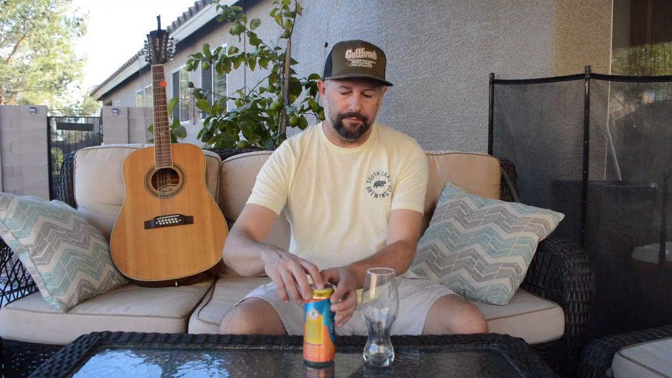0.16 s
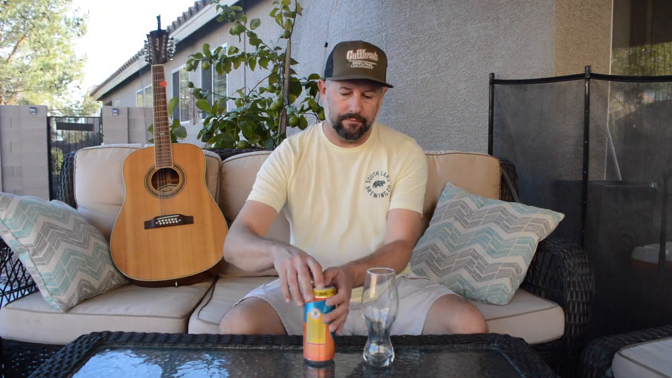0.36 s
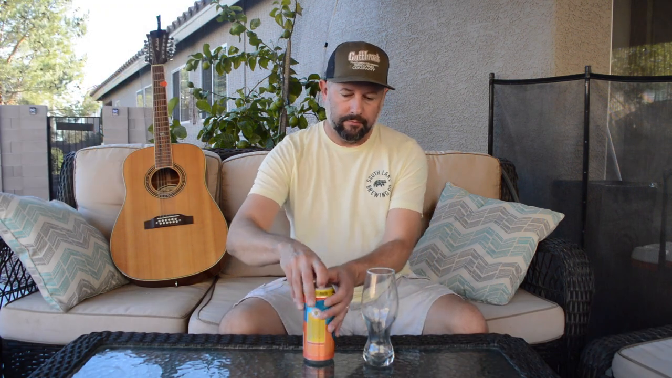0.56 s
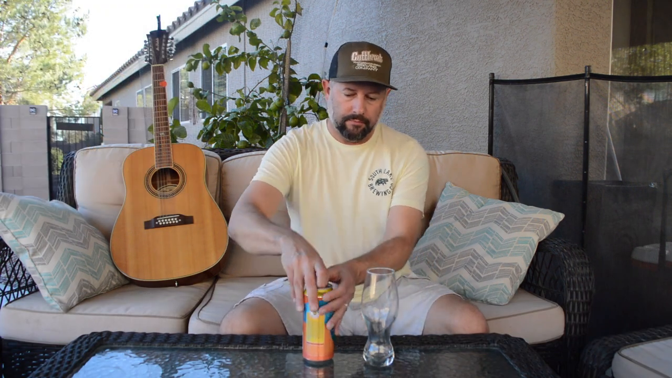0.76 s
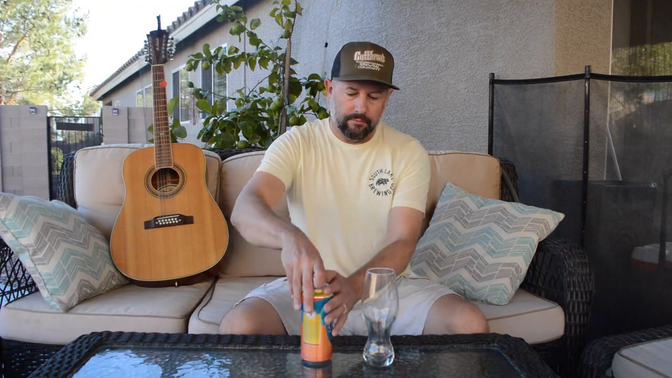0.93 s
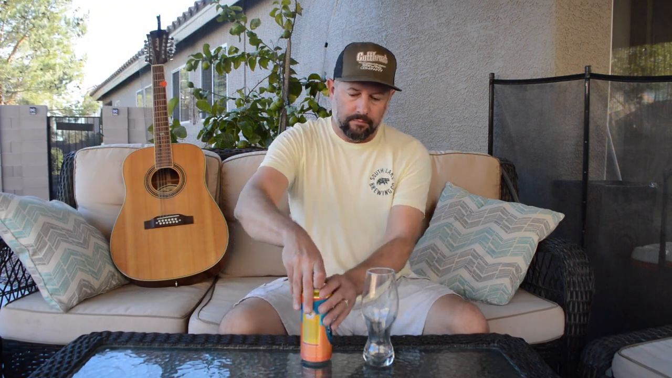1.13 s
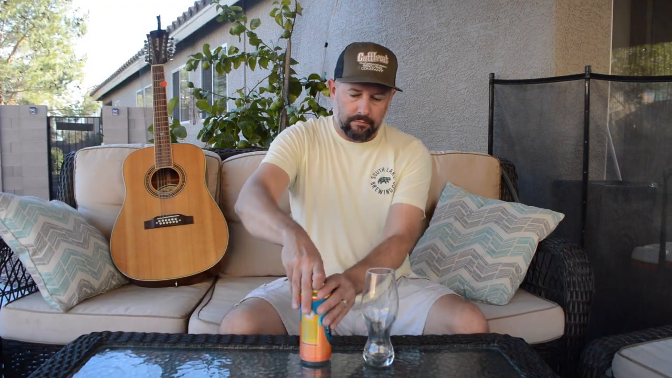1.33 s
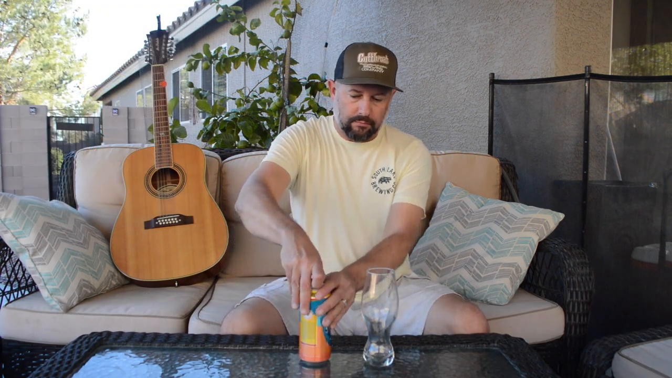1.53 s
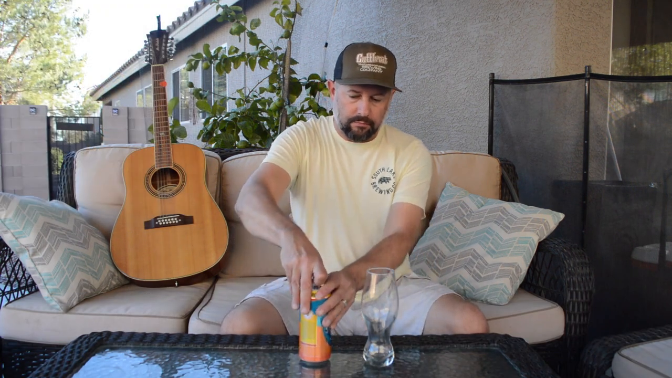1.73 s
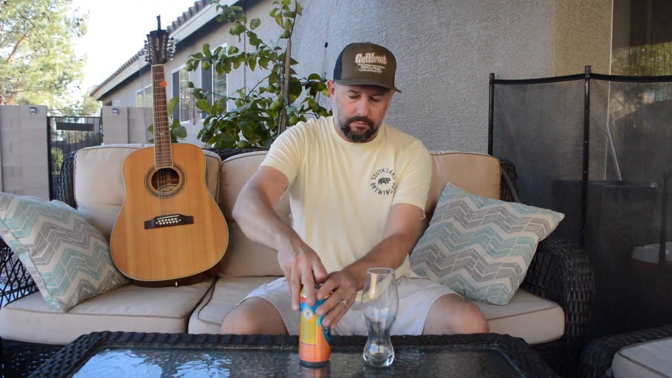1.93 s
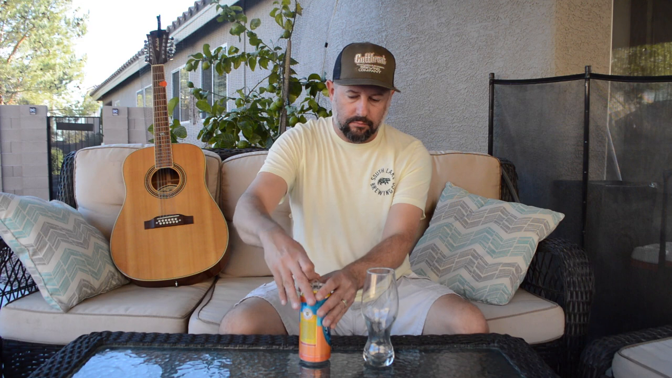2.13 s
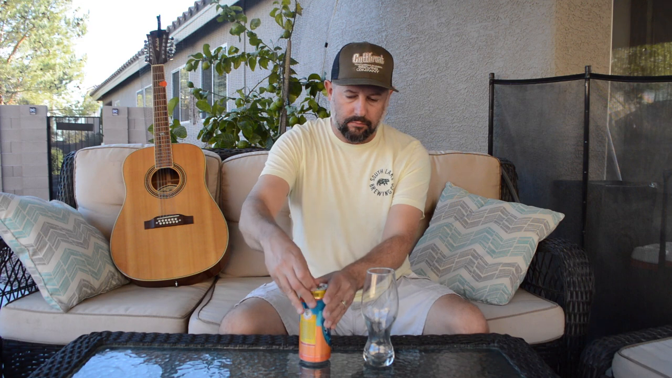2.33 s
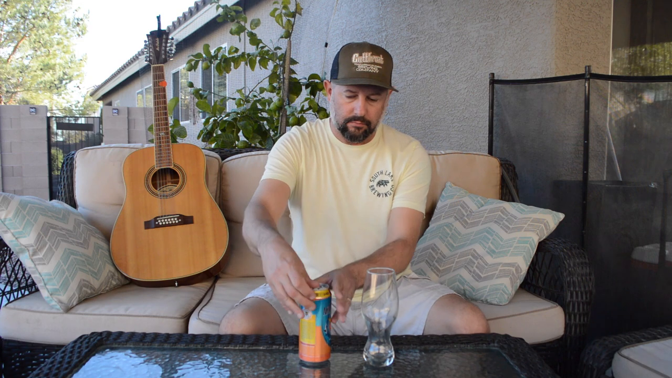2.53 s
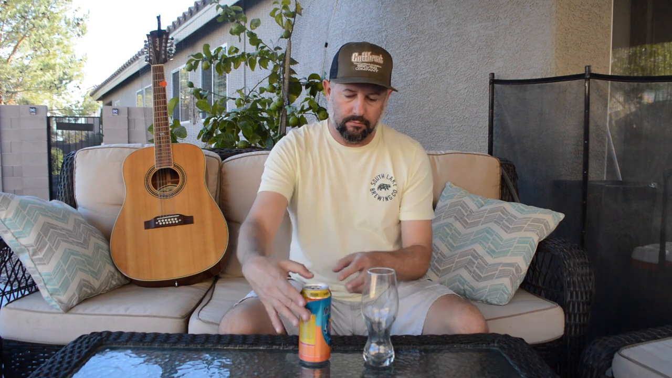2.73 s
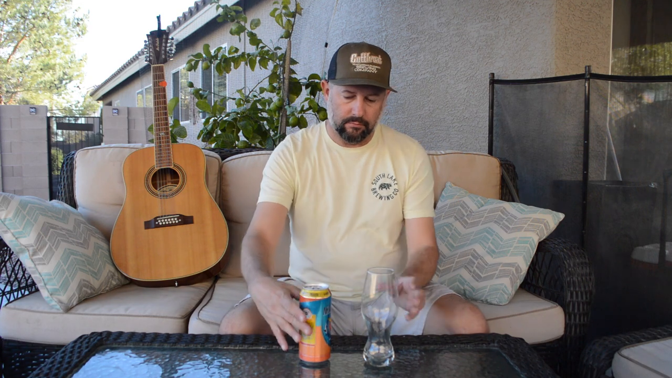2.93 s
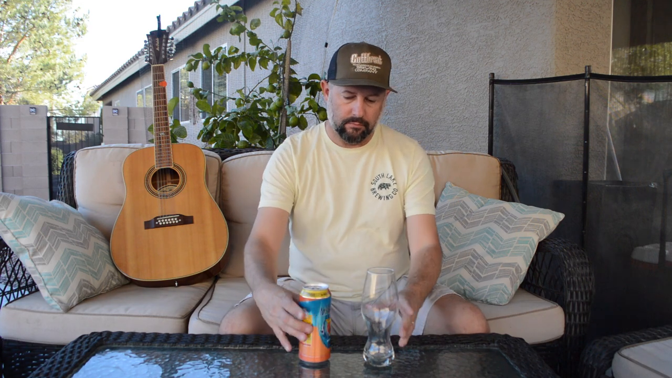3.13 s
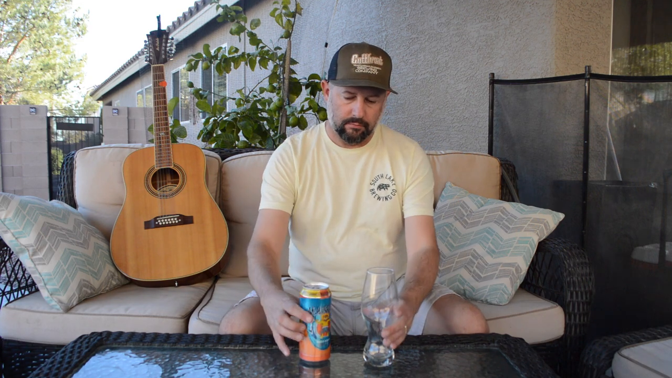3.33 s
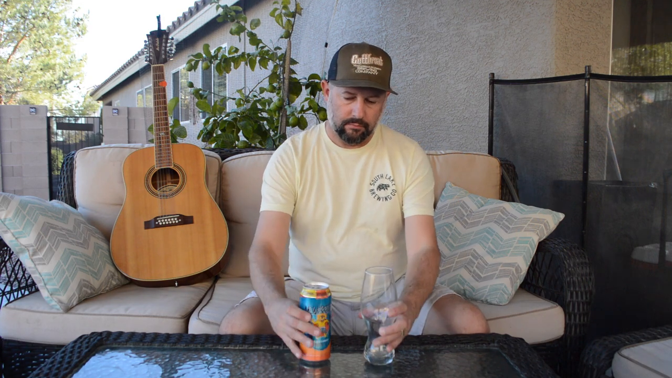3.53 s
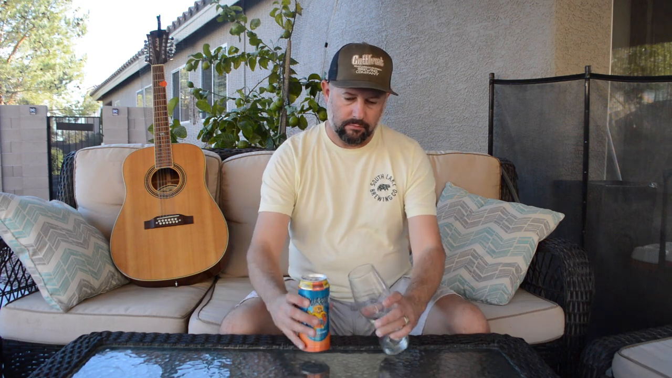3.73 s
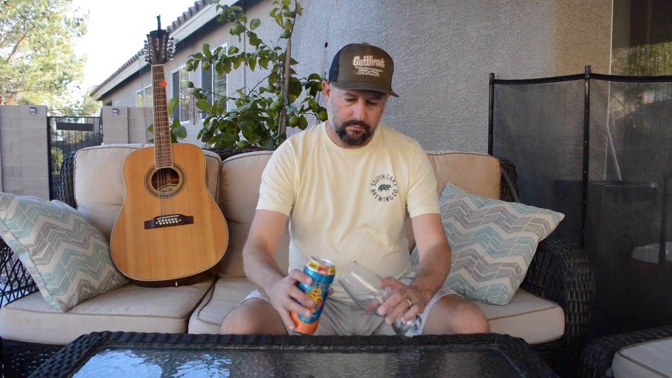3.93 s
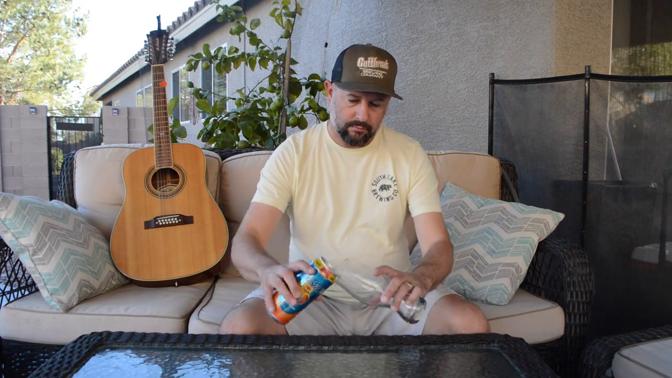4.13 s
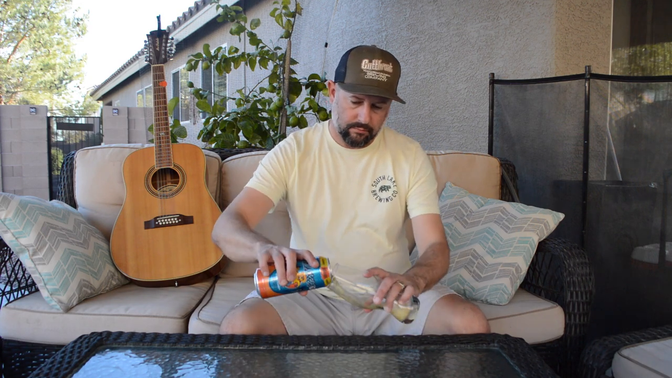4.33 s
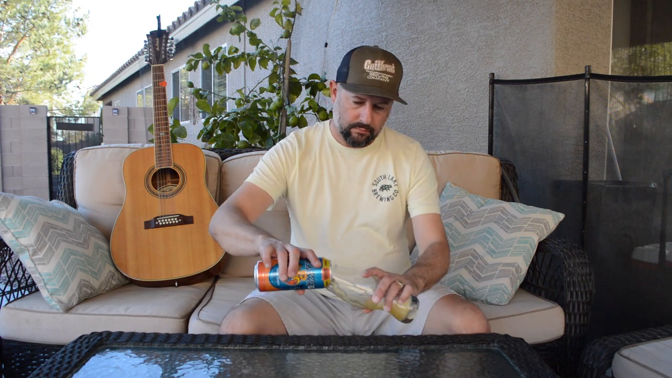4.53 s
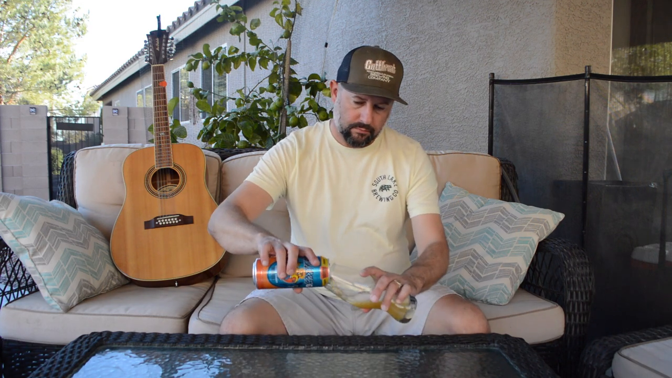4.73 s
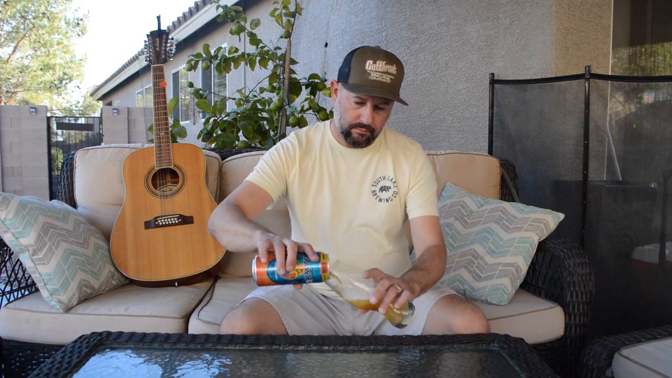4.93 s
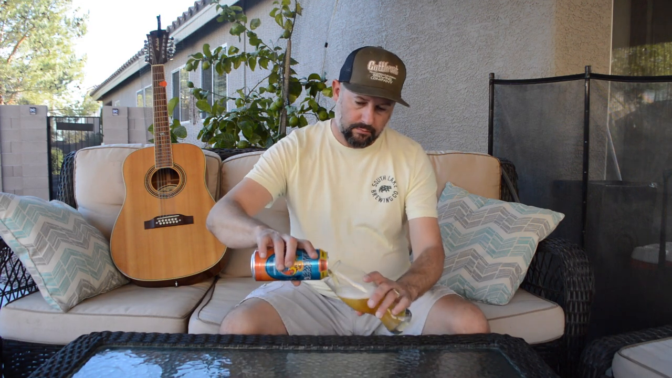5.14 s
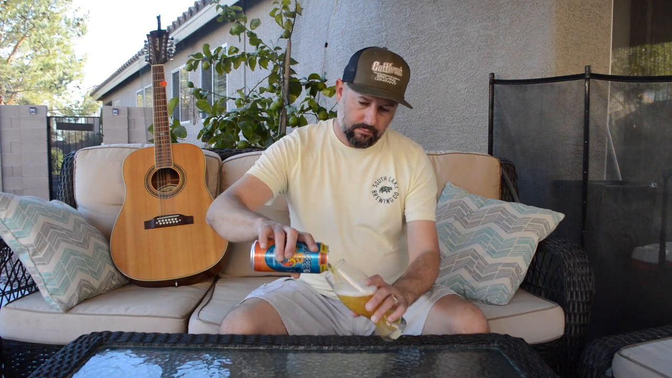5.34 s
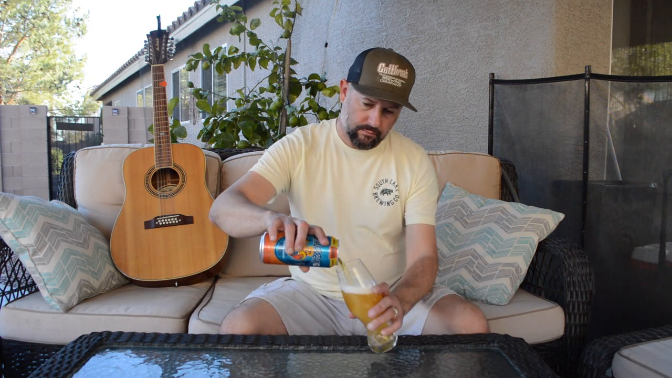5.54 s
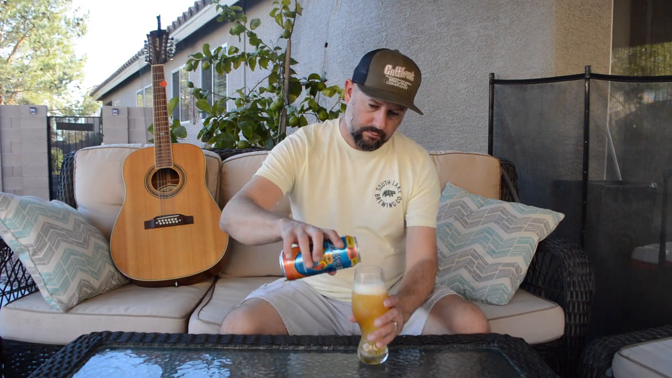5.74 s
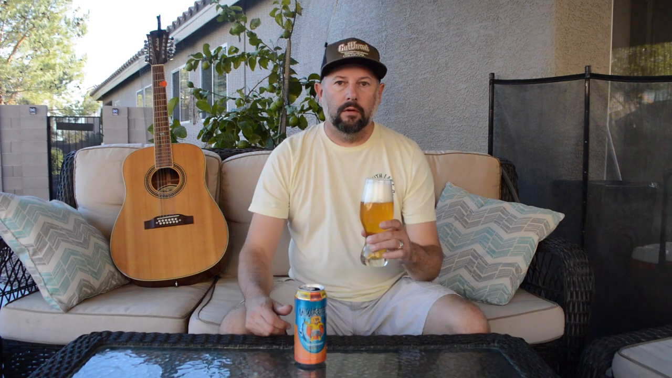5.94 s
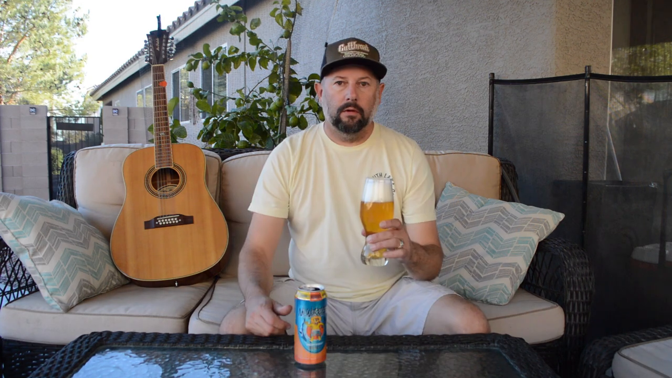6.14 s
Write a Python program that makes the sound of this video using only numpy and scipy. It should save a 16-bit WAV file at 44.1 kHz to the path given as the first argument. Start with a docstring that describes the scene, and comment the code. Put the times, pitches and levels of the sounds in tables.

```python
"""A faint, dull low sound dies away at the very start, on a covered patio.
Fingers rub the lid of a drink can, and small bumps sound from a table top.
The tab cracks the seal, gas spits out, and the lid tears and pops in, overloading the microphone.
Then can and glass shift on a glass-topped table: knocks ring it and dragged bases stick and slip.
Last, the soft rumble, hiss and hum turn thin and humming for a moment.
Near the end of that stretch comes a hard clack with a rattle; then the fuller background is back."""
import sys
import numpy as np
from scipy import signal
from scipy.fft import rfft, irfft
from scipy.io import wavfile
from scipy.ndimage import uniform_filter1d

SR = 44100
rng = np.random.default_rng(int(sys.argv[2]) if len(sys.argv) > 2 else 0)


def bounce(signal):
    """Save signal as a 16-bit WAV file at the path given by the first command-line argument."""
    frames = np.transpose(np.atleast_2d(signal))
    limited = np.clip(frames, -1, 1)
    pcm = np.round(limited * 32767).astype(np.int16)
    wavfile.write(sys.argv[1], SR, pcm)


N = 272538
T = np.arange(N) / SR  # time in the scene, s
AGE = T[:SR // 2]  # time since the start of one short sound, s

# Steps of the tear, in order seal, rip, last creak, pop:
# [t/s, level/dB, time for the crackle to fade by 60 dB/s, lid ring relative to crackle/dB]
TEAR_STEPS = [(1.5663, -10, 0.014, -16.5), (1.62, -3.5, .010, -16), (1.7547, -16.5, 0.013, -11.5),
              (1.7590, 12, 0.02, -18.5)]
# Ways the lid can ring: [f/Hz, level/dB, time to fade by 60 dB/s]
LID_MODES = [(978, -7, .35), (1050, -6, 0.15), (1231, -2, .1), (1550, -6, 0.07), (1820, -5, 0.092),
             (2010, -8, 0.33), (2110, 3.5, 0.18), (2180, -13, 0.23), (2299.9, -12, 0.25), (2520, -7, .11),
             (2640, -7.5, .12), (2751, -5.5, .1), (3353, -5.5, .08), (3445, -4, .08), (7300, -4, .1)]
# The lid changes shape as it tears: the seal and the rip have their own colours,
# the last creak and the pop share one: [f/Hz, level/dB]
SEAL_COLOUR = [(200, -23.5), (560, -17), (900, -31), (1500, -9), (2400, -16), (3200, 2.5), (4000, 1),
               (5000, 0.5), (6500, -5), (8000, -9.5), (12000, -13.5), (16000, -27.5)]
RIP_COLOUR = [(100, -48), (550, -25), (830, -37.5), (1100, -18.5), (1450, -2.5), (1750, 2), (2120, -0.5),
              (2500, -10), (3000, -11), (4400, -2.5), (5200, -9.5), (6400, -5), (8000, -20), (12000, -19.5),
              (16000, -36)]
CREAK_AND_POP_COLOUR = [(200, -31.5), (790, -21), (990, -8), (1230, -1.5), (1650, -9), (2120, 0.5),
                        (2700, 0), (3050, -6.5), (3450, -3.5), (3900, -9.5), (6200, -11), (7600, -10.5),
                        (9500, -15.5), (15000, -34.5)]
# Fingers and tab tick on the can: [t/s, level/dB, pitch region, near its upper edge f/Hz]
TAB_TICKS = [(1.694, -43.5, 5000), (1.7245, -37, 2200), (1.735, -40, 5000), (2.225, -40.5, 2600),
             (2.444, -42, 1500)]


def lid(tick_t60=.014, tick_ring_db=-14):
    """Each step of the tear crackles and rings the lid; the tab ticks as it is worked."""
    out = np.zeros(N)
    modes = ring(LID_MODES)
    colours = (SEAL_COLOUR, RIP_COLOUR, CREAK_AND_POP_COLOUR, CREAK_AND_POP_COLOUR)
    for (start, db, t60, ring_db), shape in zip(TEAR_STEPS, colours):
        # the nearly closed lid is stiff: its lowest modes speak only once it is open
        tearing = unit(colour(crackle(t60), shape))
        ringing = unit(colour(modes, shape))
        add(out, start, undb(db) * (tearing + undb(ring_db) * ringing))
    for start, db, hz in TAB_TICKS:
        tick = crackle(tick_t60) + undb(tick_ring_db) * modes
        tick = edge(edge(tick, hz / 1.5, "high"), hz * 0.98, "low")
        add(out, start, undb(db) * unit(tick))
    return out


# Colour of the escaping gas: [f/Hz, level/dB]
JET_COLOUR = [(300, -22), (900, -20), (1350, -5), (2000, -2.5), (2800, -5), (3500, -6.5), (4400, 1.5),
              (6000, -2.5), (8000, -0.5), (11000, -4.5), (12200, -2.5), (14000, -11), (16000, -12)]
SPURT_DB, SPURT_HOLD_S, SPURT_T60_S = -31.5, .039, .085
SEEP_DB, SEEP_T60_S, GAS_ATTACK_S = -41, .5, .003


def gas(sputter_db=2, spray_db=2, vent_t60=.09):
    """Pressed gas spits through the wet slit in a spurt, then seeps weakly until the lid pops in."""
    cracked, popped = TEAR_STEPS[0][0], TEAR_STEPS[-1][0]
    spurt = undb(SPURT_DB) * stroke(cracked, SPURT_HOLD_S, GAS_ATTACK_S, SPURT_T60_S)
    seep = undb(SEEP_DB) * stroke(cracked, 0, GAS_ATTACK_S, SEEP_T60_S)
    seep *= stroke(cracked, popped - cracked, GAS_ATTACK_S, vent_t60)  # vented by the pop
    spray = rng.standard_normal(N) * undb(spray_db * walk(2500))
    hiss = level(colour(spray, JET_COLOUR), 0)
    return hiss * np.hypot(spurt, seep) * undb(sputter_db * walk(400))


# Fingertips rub over the lid: [t at full speed/s, length/s, level/dB]
LID_RUBS = [(.10, .055, -63), (.86, .04, -68)]
RUB_ATTACK_S, RUB_T60_S = .14, .25


def fingers(low_hz=5000, high_hz=8500, grain_db=3):
    """Skin catches and slips on the lid, a grainy noise that swells and dies with each rub."""
    slips = rng.standard_normal(N) * undb(grain_db * walk(200))
    effort = sum(undb(db) * stroke(start, length, RUB_ATTACK_S, RUB_T60_S)
                 for start, length, db in LID_RUBS)
    return level(edge(edge(slips, low_hz, "high"), high_hz, "low"), 0) * effort


# First a faint, dull low sound that dies away at the very start;
# the later rows are bumps on the table: [t/s, level/dB, brightness f/Hz]
DULL_SOUND_AND_BUMPS = [(.008, -36, 250), (.098, -36, 600), (.485, -36, 1200), (3.106, -43.5, 1200),
                        (3.405, -43, 1000), (3.449, -31.5, 2500), (3.4658, -29.5, 1800),
                        (3.5257, -22.5, 1600), (3.5694, -29, 1200), (3.6114, -40, 1102)]
# Ways the table top can ring: [f/Hz, level/dB, time to fade by 60 dB/s]
TABLE_MODES = [(109.7, -5.5, .3), (183, -9, 0.13), (248.6, -8, 0.129), (385, -8, 0.0566), (552, -0.5, 0.1),
               (633, 0, 0.0372), (754, 5, 0.019), (976, -2.5, 0.017), (1250, 1, 0.016), (4640, -20.5, .06)]
# Colour of the scraping bases: [f/Hz, level/dB]
SCRAPE_COLOUR = [(70, -29), (112, 7), (160, -13), (240, -3), (380, -8), (560, 7), (800, -3), (1300, -5.5),
                 (2400, -21), (5000, -15.5), (10000, -30)]
# Can and glass dragged over the top: [t at full speed/s, length/s, level/dB]
BASE_DRAGS = [(3.438, .07, -51.5), (3.54, .04, -52)]
DRAG_ATTACK_S, DRAG_T60_S = .17, .3
REBOUND_S, REBOUND_DB = 0.00429, -4.5  # a bumped base rocks back and lands once more


def table(contact_db=0, contact_t60=0.019, contact_top_hz=5000, grain_db=4):
    """Bumps ring the top and rebound, sliding bases stick and slip; the dull first sound is made alike."""
    out = np.zeros(N)
    body = ring(TABLE_MODES)
    for start, db, bright_hz in DULL_SOUND_AND_BUMPS:
        for late_s, landing_db in ((0, db), (REBOUND_S, db + REBOUND_DB)):
            contact = edge(crackle(contact_t60), contact_top_hz, "low")
            # the plate radiates no deep bass
            knock = edge(body + undb(contact_db) * contact, 99.0, "high", order=4)
            knock = edge(knock, bright_hz, "low", order=1)
            add(out, start + late_s, undb(landing_db) * unit(knock))
    slips = colour(rng.standard_normal(N) * undb(grain_db * walk(270)), SCRAPE_COLOUR)
    effort = sum(undb(db) * stroke(start, length, DRAG_ATTACK_S, DRAG_T60_S)
                 for start, length, db in BASE_DRAGS)
    return out + level(slips, 0) * effort


# A hard clack and its two bounces: [t/s, level/dB]
CLACK_HITS = [(5.6727, -20), (5.6903, -33), (5.7094, -35)]
# Colour of the clack: [f/Hz, level/dB]
CLACK_COLOUR = [(150, -22), (500, -7), (800, 3.5), (1200, 0.5), (2200, 5), (3000, 4), (3900, 4),
                (5000, -2.5), (5800, 6.5), (6800, -5.5), (10000, -2.5), (15500, -1)]
CHATTER_S, CHATTER_LENGTH_S, CHATTER_DB = 5.699, .02, -40
CLACK_TOP_HZ, DULLING_DB_PER_OCTAVE = 13970, 16  # weaker contacts are duller


def clack(body_db=0, body_t60=0.026, tail_db=-8, tail_t60=0.073, scatter_db=1.5, count=4):
    """A dry, hard contact bounces twice and chatters at random as it settles."""
    out = np.zeros(N)
    chatter = []
    for k in range(count):
        start = CHATTER_S + CHATTER_LENGTH_S * (k + rng.random()) / count
        chatter.append((start, CHATTER_DB + scatter_db * rng.standard_normal()))
    for start, db in list(CLACK_HITS) + chatter:
        top_hz = CLACK_TOP_HZ * 2 ** ((db - CLACK_HITS[0][1]) / DULLING_DB_PER_OCTAVE)
        hit = unit(signal.unit_impulse(len(AGE)))
        hit = hit + undb(body_db) * crackle(body_t60) + undb(tail_db) * burst(tail_t60)
        add(out, start, undb(db) * unit(edge(colour(hit, CLACK_COLOUR), top_hz, "low")))
    return out


# Single reflections, before the overall room level: [delay t/s, level/dB]
SINGLE_ECHOES = [(.0024, -19.5), (.0082, -22), (0.0104, -20.5), (0.0141, -19)]
# Colour of the blurred tail: [f/Hz, level/dB]
PATIO_COLOUR = [(100, -4), (500, -2), (1000, 0), (1600, -3), (2150, 0.5), (2700, -3), (3600, -1.5),
                (4700, 1), (7500, -2.5), (10000, -3.5), (15000, -13.5)]


def patio(x, echoes, early_db=-8, early_t60=.13, late_db=-18, late_t60=.46, build_s=.006):
    """Table and walls throw back any single echoes given, and a short blurred tail."""
    late = edge(burst(late_t60), 5500, "low", order=1)
    tail = undb(early_db) * burst(early_t60) + undb(late_db) * late
    response = colour(tail * (1 - np.exp(-AGE / build_s)), PATIO_COLOUR) / np.sqrt(SR / 4000)
    for delay, db in echoes:
        response[int(delay * SR)] += undb(db)
    return signal.fftconvolve(x, response)[:N]


# Colours of the full and the thin background: [f/Hz, level/dB]
AIR_COLOUR = [(12, -39), (20, -11.5), (49, -3.5), (107, -3), (210, -6.5), (285, -7.5), (472, -11),
              (590, -10), (976, -12), (2020, -16), (2200, -16), (2460, -16.5), (14700, -19.5), (16000, -19)]
THIN_COLOUR = [(12, -47), (20, -36.5), (116, -16), (150, -12), (198, -14.5), (234, -9.5), (377, -11),
               (434, -12), (472, -9), (642, -12), (1810, -15.5), (2020, -15.5), (4540, -18.5), (16000, -23)]
# Hum tones of each background, before they waver: [f/Hz, level (rms)/dB]
AIR_TONES = [(59, -76.5), (119, -73), (238, -78)]
THIN_TONES = [(149.5, -80), (234, -79.5), (240.5, -79.5), (379.5, -81.5), (479.3, -74.5), (958.5, -82),
              (4716, -83.5), (5706, -89)]
# Share of the background noise that differs between left and right: [f/Hz, level/dB]
SIDE_SHARE = [(50, -16.5), (200, -12), (700, -9), (2000, -6.5), (5000, -3.5), (14000, -2.5)]
AIR_DB, THIN_DB = -57.97, -61.5
THIN_FROM_S, THIN_TO_S = 4.14, 5.81


def background(spectrum, db, tones, flicker_db=0.25, waver_db=2):
    """Rumble and even hiss under wavering hum tones; the hiss is wide, the bass central."""
    mid = level(colour(rng.standard_normal(N), spectrum), db)
    side = level(colour(rng.standard_normal(N), spectrum), db)
    hum = np.zeros(N)
    for hz, tone_db in tones:
        tone = np.sin(2 * np.pi * hz * T + .5 * walk(3))
        hum += level(tone, tone_db) * undb(waver_db * walk(3.1))
    return stereo(mid * undb(flicker_db * walk(6.6)) + hum, colour(side, SIDE_SHARE))


def undb(db):
    """Turn decibels into a gain."""
    return 10 ** (np.asarray(db) / 20)


def level(x, db):
    """Set the average (rms) level in dB."""
    return x * undb(db) / np.std(x)


def unit(x):
    """Scale a short sound to the energy of a full-scale pulse of a quarter millisecond."""
    return x * np.sqrt(SR / 4000 / np.sum(x ** 2))


def fade(t60):
    """Die away smoothly, by 60 dB in t60 seconds."""
    return np.exp(-np.log(1000) * AGE / t60)


def burst(t60):
    """Noise that dies away."""
    return unit(rng.standard_normal(len(AGE)) * fade(t60))


def crackle(t60):
    """A dying run of dense tiny fractures, with an even spectrum."""
    even = irfft(np.exp(1j * np.angle(rfft(burst(t60)))), len(AGE))  # keep only the phases
    return unit(even * fade(10 * t60))


def ring(modes):
    """A struck body rings in several fading tones at once."""
    return unit(sum(undb(db) * fade(t60) * np.sin(2 * np.pi * hz * AGE) for hz, db, t60 in modes))


def edge(x, hz, kind, order=2):
    """Weaken what lies above (low) or below (high) a frequency."""
    sos = signal.butter(order, min(hz, .45 * SR), kind, fs=SR, output="sos")
    return signal.sosfilt(sos, x)


def colour(x, points, size=4096):
    """Shape the spectrum through (f/Hz, level/dB) points, without sound ahead of its cause."""
    hz, db = np.transpose(points)
    grid = np.log(np.arange(size // 2 + 1) * SR / size + 1)
    cepstrum = irfft(np.log(undb(np.interp(grid, np.log(hz), db))))
    # folding the cepstrum forward in time makes the filter minimum-phase
    cepstrum[1:size // 2] *= 2
    cepstrum[size // 2 + 1:] = 0
    return signal.fftconvolve(x, irfft(np.exp(rfft(cepstrum))))[:len(x)]


def walk(rate):
    """Random drift around zero with a spread of 1, drawn anew rate times a second and smoothed."""
    k = int(SR / rate)
    steps = np.repeat(rng.standard_normal(N // k + 1), k)[:N]
    return level(uniform_filter1d(steps, k), 0)


def stroke(s, hold_s, attack_s, t60):
    """Loudness curve that rises 60 dB in the attack up to time s, holds, then dies away."""
    before = np.maximum(s - T, 0) / attack_s
    after = np.maximum(T - s - hold_s, 0) / t60
    return 1000. ** -(before + after)


def add(out, s, sound):
    """Mix a sound in at time s."""
    i = int(s * SR)
    out[i:i + len(sound)] += sound[:N - i]


def stereo(mid, side):
    """Left and right from the shared part (mid) and the difference (side)."""
    return np.array([mid + side, mid - side])


def scene(room_db=2, width_db=-13, wide_above_hz=2500):
    """The can sits in the middle; only its reflections have a little width, mostly in the treble."""
    near = lid() + gas() + fingers() + table()
    centre = near + undb(room_db) * patio(near, SINGLE_ECHOES) + clack()
    width = undb(width_db) * edge(patio(near, []), wide_above_hz, "high", order=1)
    # a short crossfade leads into and out of the thin stretch
    thin = uniform_filter1d(1. * ((T > THIN_FROM_S) & (T < THIN_TO_S)), size=1024)
    air = (1 - thin) * background(AIR_COLOUR, AIR_DB, AIR_TONES)
    air += thin * background(THIN_COLOUR, THIN_DB, THIN_TONES)
    return stereo(centre, width) + air


def record(dry):
    """The microphone overloads: peaks are clipped at full scale, then the top above 16 kHz is cut."""
    clipped = np.clip(dry, -1, 1)
    return signal.sosfiltfilt(signal.ellip(10, .05, 60, 16000, fs=SR, output="sos"), clipped)


dry = scene()
out = record(dry)
bounce(out)
```